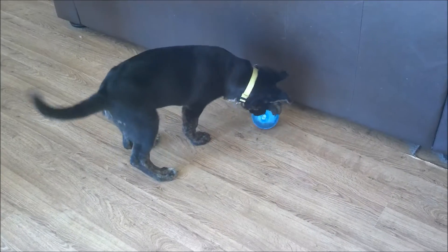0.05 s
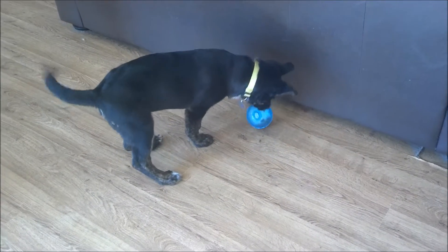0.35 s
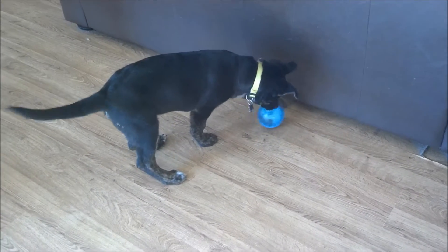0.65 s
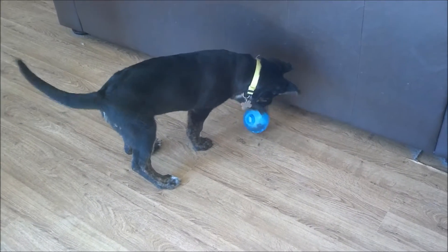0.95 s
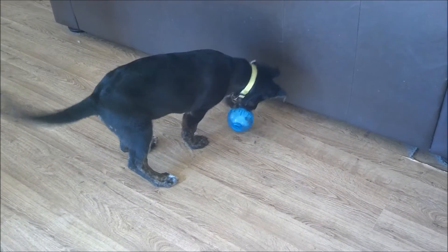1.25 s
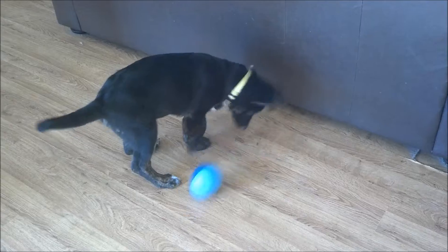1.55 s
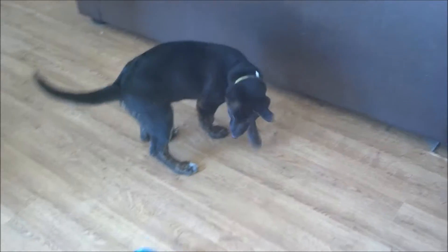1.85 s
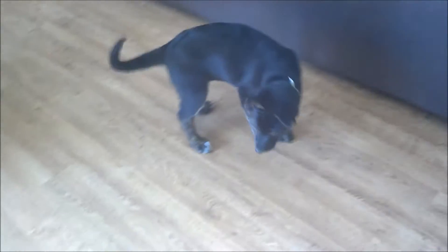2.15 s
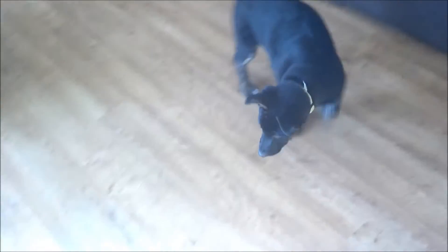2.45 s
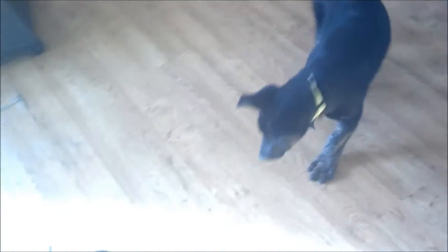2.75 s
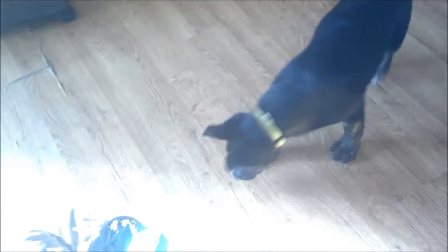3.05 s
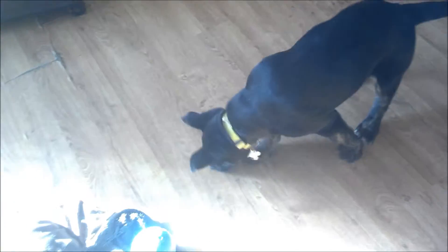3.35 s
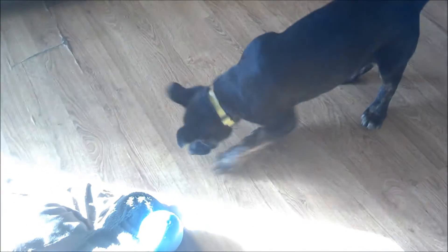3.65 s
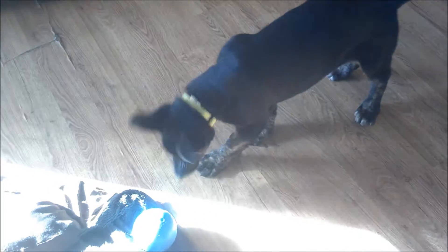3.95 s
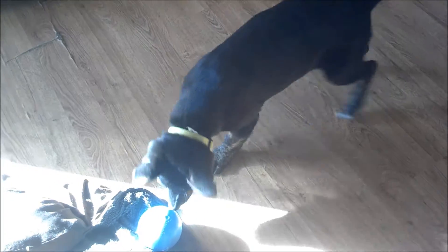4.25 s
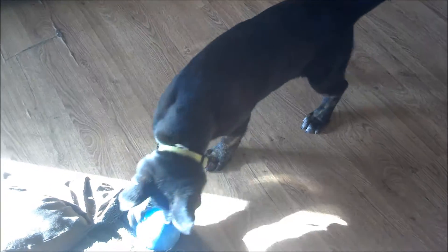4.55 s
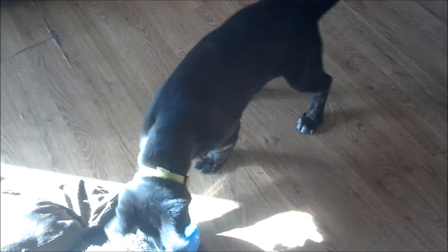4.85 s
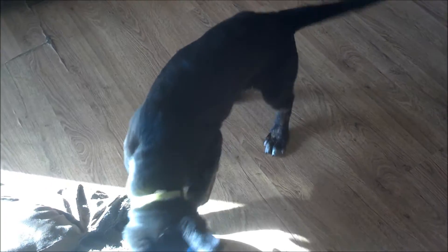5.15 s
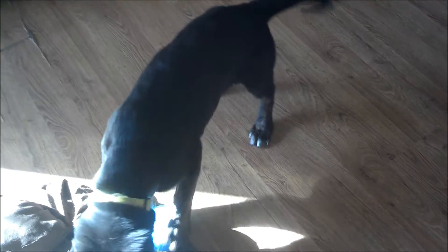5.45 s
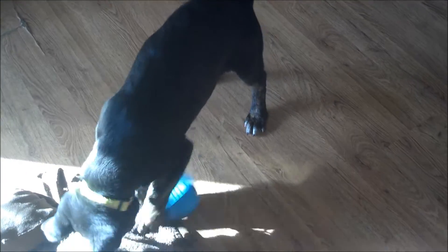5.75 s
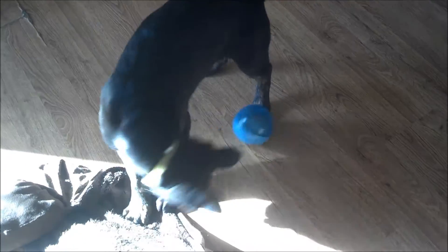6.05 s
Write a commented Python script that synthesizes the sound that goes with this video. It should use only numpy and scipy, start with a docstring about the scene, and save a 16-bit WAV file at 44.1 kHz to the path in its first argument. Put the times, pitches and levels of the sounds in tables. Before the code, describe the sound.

A puppy plays with a hollow plastic treat ball on a laminate floor, heard close and slightly to the left in a small room. For the first 1.5 seconds, teeth and claws tick on the shell and kibble rattles in short nudges, with low rubbing judders near 0.6 and 1.4 seconds. At 1.5 seconds the ball rolls free with a hollow rumble and clattering pellets, bumping quickly over the boards from about 2 to 2.6 seconds among sharp clicks. The rattle settles by 3 seconds, leaving soft paw thuds and faint ticks. Cloth begins to rustle, growing into stronger shoves from 4.4 seconds as the puppy rummages. Its metal collar tag jingles briefly at about 4.4 and 4.9 seconds. At 5.8 seconds comes one hard bang, the loudest sound, and the ball rolls again, rattling and clicking to the end.

```python
"""A small room with a laminate floor; a close stereo microphone pair, the action a little to the left.
A puppy noses a hollow plastic treat ball: kibble rattles inside, claws and teeth tick on the shell.
At 1.5 s the ball rolls free, rumbling and bumping over the boards past the microphones.
From 3 s the puppy rummages after it in a heap of cloth, its collar tag jingling.
At 5.8 s one hard bang knocks the ball loose and it rolls again."""
import sys
import numpy as np
from scipy import signal
from scipy.fft import rfft, irfft
from scipy.io import wavfile
from scipy.ndimage import uniform_filter1d

SR = 44100
rng = np.random.default_rng(int(sys.argv[2]) if len(sys.argv) > 2 else 0)


def int16_out(signal):
    """Quantize to a 16-bit WAV file."""
    q = np.round(np.clip(np.atleast_2d(signal).T, -1, 1) * 32767)
    wavfile.write(sys.argv[1], SR, q.astype(np.int16))


N = 272979
T = np.arange(N) / SR

# spectrum of the room tone: frequency_hz, level_db
ROOM_TONE_SPECTRUM = [(30, -26), (70, -37), (130, -6.5), (320, 7.5), (600, -5), (1000, 0), (2000, -12.5),
                      (3600, -1.5), (4800, -16), (6600, -8), (10000, -15), (15500, -10)]
# how hard nose and paws work in the cloth: time_s, effort_db
RUMMAGE_EFFORT = [(3.15, -71.5), (3.48, -61), (3.67, -61), (4.34, -55.5), (4.71, -51), (4.93, -47),
                  (5.27, -55.5), (5.52, -51.5), (5.77, -53.5)]
# quick shoves of the muzzle over the ball and through the cloth: start_s, length_s, level_db
MUZZLE_SHOVES = [(0.512, 0.1, -48.5), (3.22, 0.014, -57), (4.489, 0.08, -43), (4.707, 0.15, -50.5),
                 (4.876, 0.068, -45), (5.008, 0.026, -44.5), (5.107, 0.018, -50.5), (5.314, .01, -48.5),
                 (5.325, 0.067, -44.5), (5.674, 0.071, -43.5)]
# spectrum of catching fibres: frequency_hz, level_db
FIBRE_SPECTRUM = [(800, -11), (1400, 3.5), (2200, 1), (3600, 5), (4800, -4.5), (6500, 7.5), (8500, -3),
                  (10000, -8.5), (15500, -19)]
# spectrum of the whole heap rubbing: frequency_hz, level_db
HEAP_SPECTRUM = [(40, -47), (100, -4.5), (200, -1.5), (380, 3), (700, -3), (1300, -9), (2200, -16.5),
                 (5000, -22.5)]
# the collar tag touches its ring: start_s, level_db, tilt_db_per_octave
TAG_TOUCHES = [(3.417, -37.5, -44), (3.872, -38.5, -39), (4.219, -37, -28), (4.385, -30.5, -40),
               (4.4095, -13.5, -25), (4.423, -23, -3), (4.865, -17.5, -34), (4.883, -22, -2)]
# the chatter within one touch: delay_s, level_db
TAG_CHATTER = [(0, -3.5), (.006, -1.5), (.013, -7.5)]
# modes of the metal tag: pitch_hz, level_db, t60_s
TAG_MODES = [(6600, -10, .06), (7400, -3.5, .08), (8366, -9, .1), (9745, 0, .09), (11970, -3, .12),
             (14060, -14, .1), (15140, 0, .11)]
# claws, teeth and single pellets on plastic and floor: start_s, level_db, pitch_hz, t60_ms
TIP_CLICKS = [(0.115, -38.5, 6700, 19), (0.2466, -21.5, 6730, 13), (0.2605, -25.5, 6740, 17),
              (0.321, -34, 8500, 12), (0.3277, -28, 6540, 16), (0.3844, -25.5, 6740, 21),
              (0.4293, -28.5, 6700, 13), (0.453, -29.5, 6660, 31), (0.4936, -19, 6740, 9.6),
              (0.5264, -36, 3720, 8.7), (0.5973, -27.5, 6500, 18), (0.6105, -23, 6200, 14),
              (0.626, -25.5, 6200, 11), (0.689, -28, 7450, 24), (0.703, -25, 7400, 16),
              (0.7328, -17.5, 6200, 5), (0.7375, -25.5, 5570, 9.8), (0.9704, -32, 6470, 12),
              (1.133, -37.5, 6100, 20), (1.259, -44, 6350, 8), (1.3144, -29.5, 5860, 10),
              (1.357, -28.5, 6200, 16), (1.381, -27, 6250, 4.4), (1.417, -25, 6370, 9.5),
              (1.4558, -23, 6300, 10), (1.467, -21, 6200, 6.6), (1.4854, -18, 5900, 12),
              (1.5404, -24, 6340, 12), (1.559, -20, 6800, 15), (1.707, -22, 6500, 27),
              (1.75, -17, 6460, 15.5), (1.7875, -18, 6500, 24), (2.134, -27, 6700, 16),
              (2.1791, -25.5, 6750, 12), (2.2603, -24, 6540, 9), (2.3263, -22.5, 6600, 6.7),
              (2.3495, -23, 6500, 9.8), (2.3772, -18.5, 6600, 8.1), (2.5244, -24, 6730, 7),
              (2.6081, -22, 3700, 7.6), (2.6346, -16.5, 6600, 4.9), (2.71, -30, 6640, 9.4),
              (2.725, -22.5, 6600, 7.5), (2.762, -27, 6700, 29), (2.8604, -28.5, 6680, 9.8),
              (2.8913, -35, 6570, 23), (2.8992, -34, 3550, 16), (3.042, -43, 3520, 8.2),
              (3.131, -48, 3530, 10), (3.238, -41, 6200, 11), (3.483, -39, 6860, 6.9),
              (4.4987, -34, 6600, 13), (4.525, -22, 6400, 19), (4.5454, -30, 6470, 9.2),
              (4.764, -31.5, 3630, 4.5), (4.9512, -28.5, 6200, 8.2), (4.965, -38, 6170, 11),
              (5.028, -26.5, 6760, 16), (5.0545, -25.5, 6700, 6.1), (5.3397, -25.5, 6400, 27),
              (5.892, -28, 6500, 11), (5.933, -22, 6540, 7.4), (5.9633, -27, 6200, 5.4),
              (5.9865, -18, 6700, 7.8), (6.0288, -18.5, 6740, 5)]
# clicks dull as the ball passes the microphones into the cloth, and clear as it leaves: start_s, top_hz
SNAP_CUTOFFS = [(0, 13800), (1.9, 9100), (4.45, 7500), (5.75, 11000)]
# the ball sticks and slips under the nose: start_s, length_s, gap_s, level_db, pitch_hz
STICK_SLIPS = [(0.607, .085, 0.031, -26, 284), (1.439, .055, .02, -25.5, 310)]
# modes of the pressed ball: pitch_ratio, level_db
PRESSED_MODES = [(.62, -13), (1, 0), (1.33, -5), (1.85, -10)]
# modes of the floorboards: pitch_hz, level_db, t60_s
BOARD_MODES = [(133, 2.5, 0.26), (162, 6.5, 0.16), (216, 7, 0.14), (257.5, 8, .058), (390, -3.5, 0.073),
               (499, -18.5, 0.28), (594, -15, 0.1)]
# the rolling ball bumps over its seam and openings: start_s, level_db
SEAM_BUMPS = [(1.665, -28.5), (1.93, -25.5), (1.9689, -23.5), (1.9962, -18.5), (2.0401, -14), (2.089, -18),
              (2.1265, -18), (2.1715, -12.5), (2.232, -20), (2.272, -14.5), (2.3168, -18.5), (2.349, -19),
              (2.394, -18.5), (2.403, -15), (2.4342, -15), (2.464, -21), (2.489, -20.5), (2.518, -21),
              (2.5474, -16), (2.58, -19.5)]
# paws and ball thud on the boards: start_s, level_db
FLOOR_THUDS = [(3.047, -38), (3.496, -43.5), (3.583, -41), (3.753, -34), (4.688, -38.5), (5.123, -28.5),
               (5.796, -10), (5.817, -15.5), (6.182, -21)]
# the shell is rapped, then slammed down: start_s, level_db, nominal_pitch_hz, t60_ms
SHELL_RAPS = [(5.039, -28.5, 1290, 6.2), (5.7942, -3, 800, 3.4)]
# the nose nudges the ball: start_s, length_s, rise_s, rattle_db, rub_over_rattle_db
NOSE_NUDGES = [(0, 0.0018, 0.00067, -42, -7.5), (0.075, 0.2, 0.0078, -67, 11), (0.236, 0.61, 0.004, -55, 1),
               (0.578, 0.053, 0.0049, -38.5, -8), (0.947, 0.26, 0.0021, -58, -4),
               (1.231, 0.048, 0.066, -43, -13), (1.34, 0.23, 0.074, -33.5, -12),
               (1.432, 0.018, 0.0048, -32.5, -1)]
# the ball rolls free: start_s, length_s, rattle_db, scrape_db, rumble_db, launch_speed_ratio, settle_s
FREE_ROLLS = [(1.52, 1.09, -40.5, -51, -41, 1.24, 0.35), (5.794, 0.22, -36, -53.5, -33, 1.35, 0.058)]
# the ball drones on the boards, lower as it slows: time_s, pitch_hz, level_db
DRONE_GLIDE = [(1.49, 710, -36), (1.559, 670, -43), (1.639, 650, -47), (1.726, 615, -35), (1.811, 580, -52),
               (1.939, 560, -41.5), (2.05, 520, -68)]
# modes of the hollow ball, woken by a fast roll: pitch_hz, level_db, t60_s
HOLLOW_MODES = [(485, -6, 0.21), (590, -0.5, 0.13), (718, 7, 0.16), (827, 0.5, .14), (958, -2, 0.13),
                (1078, -8, 0.12)]
# spectrum of the shell scraping the floor: frequency_hz, level_db
SCRAPE_SPECTRUM = [(120, -55), (300, -38), (550, 2.5), (800, -5), (1300, 4), (1850, 1), (2150, 7),
                   (3600, -24.5), (5000, -2), (12000, -12)]
# spectrum of the rumble at a speed ratio of 1: frequency_hz, level_db
RUMBLE_SPECTRUM = [(30, -33), (110, -33), (200, -8), (330, -5), (430, -0.5), (550, 2), (640, 1.5),
                   (850, -7), (1400, -10.5), (2400, -39)]
# spectrum of sliding kibble: frequency_hz, level_db
KIBBLE_SPECTRUM = [(1500, -16.5), (2900, -5), (3500, -1.5), (4700, -11), (5600, -1), (6500, 2),
                   (7400, -6.5), (8600, -1.5), (9800, -16.5), (12000, -20.5), (15500, -45)]
# modes of the plastic shell under the pellets: pitch_hz, level_db, t60_s
SHELL_MODES = [(3340, -2, 0.0094), (4000, 0.5, 0.033), (5700, -11, 0.015), (6130, 7.5, 0.012),
               (6436, 11, 0.016), (6850, 5, 0.045), (8300, 0.5, 0.015), (10900, -3, 0.011)]
# dips and a lift in the difference of the two microphones: centre_hz, half_width_hz, gain_db
SIDE_EQ = [(1217, 370, -16), (2130, 380, 7), (3570, 280, -26)]

KNOCK_T60_MS = 27.2  # decay of a bump or thud


def undb(db):
    """Decibels to gain."""
    return 10 ** (np.asarray(db) / 20)


def unit(x):
    """Scale to rms 1."""
    return x / np.sqrt(np.mean(x ** 2))


def together(gains):
    """The joint gain of unrelated sounds: their powers add."""
    return np.sqrt(np.sum(np.square(gains), axis=0))


def butter(x, order, hz, kind="low"):
    """Pass x through a Butterworth filter."""
    return signal.sosfilt(signal.butter(order, hz, kind, fs=SR, output="sos"), x)


def colour(x, spectrum):
    """Shape x by a spectrum of frequency_hz, level_db points; rms 1."""
    hz, db = np.transpose(spectrum)
    f = np.fft.rfftfreq(N, 1 / SR) + 1
    return unit(irfft(rfft(x) * undb(np.interp(np.log(f), np.log(hz), db)), N))


def band_gain(x, hz, half_width_hz, gain_db):
    """Turn a narrow band up or down."""
    f = np.fft.rfftfreq(N, 1 / SR)
    dip = (1 - undb(gain_db)) / (1 + ((f - hz) / half_width_hz) ** 4)
    return irfft(rfft(x) * (1 - dip), N)


def add(track, start_s, sound):
    """Mix a sound into a track."""
    i = int(np.clip(start_s * SR, 0, N - 1))
    track[..., i:i + sound.shape[-1]] += sound[..., :N - i]


def ring(modes, t):
    """A sum of decaying modes."""
    return sum(undb(db - 60 * t / t60) * np.sin(2 * np.pi * hz * t) for hz, db, t60 in modes)


def grains(per_s, spread_db):
    """Tiny impacts at random moments; a wide spread makes a few much larger than the rest."""
    size = undb(spread_db * np.minimum(rng.exponential(size=N), 4))
    return (rng.random(N) < per_s / SR) * size * rng.choice([-1, 1], N)


def flutter(rate_hz, depth_db):
    """A gain that wanders at random."""
    steps = rng.standard_normal(4096)
    return undb(depth_db * np.interp(T * rate_hz, np.arange(len(steps)), steps))


def swell(start_s, length_s, rise_s, t60_s):
    """A gain that rises, holds and dies away."""
    out, age = np.zeros(N), T[:int((length_s + t60_s) * SR)]
    fade = undb(-60 * np.maximum(age - length_s, 0) / t60_s)
    add(out, start_s, (1 - np.exp(-age / rise_s)) * fade)
    return out


def mic_pair(mid, side, apart_hz):
    """Two closely spaced microphones differ a little more in the treble than in the bass."""
    side = 0.75 * side + 0.25 * butter(side, 2, apart_hz, "high")
    return np.array([mid + side, mid - side]) / np.sqrt(2)


def room(x, wet_db):
    """Floor and near walls answer within milliseconds, then thicken into a short tail."""
    low_t60_s, high_t60_s = 0.46, 0.49
    t = T[:SR * 3 // 4]
    echoes = rng.standard_normal((2, len(t))) * (1 + 3 * (rng.random((2, len(t))) < .01))
    low = butter(echoes, 2, 2500) * undb(-60 * t / low_t60_s)
    high = butter(echoes, 2, 2500, "high") * undb(-60 * t / high_t60_s)
    onset = np.clip((t - .003) / 0.0019, 0, 1)
    early_lift = 1 + 2.77 * np.exp(-t / 0.012)
    tail = (low - high) * onset * early_lift
    tail /= np.sqrt(np.sum(tail ** 2, axis=1, keepdims=True))
    wet = signal.fftconvolve(np.atleast_2d(x), mic_pair(*tail, apart_hz=1460), axes=1)[:, :N]
    return (x + undb(wet_db) * wet) / np.sqrt(1 + undb(wet_db) ** 2)


def room_tone():
    """A faint steady hush, with low noise unrelated between left and right."""
    hush = mic_pair(*rng.standard_normal((2, N)), apart_hz=1230)
    low = butter(rng.standard_normal((2, N)), 2, 90)
    return undb(-63.5) * colour(hush + 6.4 * low, ROOM_TONE_SPECTRUM)


def cloth():
    """Fibres slip and catch under nose and paws, over the duller rub of the whole heap."""
    effort_db = np.interp(T, *np.transpose(RUMMAGE_EFFORT), left=-np.inf, right=-np.inf)
    steady = undb(-66 + 2.1 * (effort_db + 55))  # the rustle grows faster than the effort
    shoves = [undb(db) * swell(s, length, rise_s=0.0021, t60_s=0.33) for s, length, db in MUZZLE_SHOVES]
    rustle = together([steady] + shoves) * undb(5.5)
    catches = mic_pair(grains(1800, spread_db=2.5), 0.66 * grains(2200, spread_db=4.5), apart_hz=1760)
    fibres = colour(catches, FIBRE_SPECTRUM) * flutter(rate_hz=59, depth_db=1.5) * rustle
    heap = colour(rng.standard_normal(N), HEAP_SPECTRUM) * flutter(rate_hz=25, depth_db=2.0)
    return room(fibres, wet_db=-7.0) + room(heap * undb(effort_db + 2.5), wet_db=3.5)


def collar_tag():
    """The metal tag chatters against its ring, which detunes it a little at every contact."""
    out, t = np.zeros((2, N)), T[:SR // 6]
    detune, lowest_hz = .0025, TAG_MODES[0][0]
    for s, db, tilt_db in TAG_TOUCHES:
        modes = [(hz, mode_db + tilt_db * np.log2(hz / lowest_hz), t60) for hz, mode_db, t60 in TAG_MODES]
        for delay_s, bounce_db in TAG_CHATTER:
            metal = np.zeros((2, len(t)))
            for channel in metal:
                detuned = [(hz * (1 + detune * rng.standard_normal()), *rest) for hz, *rest in modes]
                channel += ring(detuned, t)
            grating = rng.standard_normal(metal.shape) * undb(-12 - 60 * t / 0.041)
            touch = butter(metal + grating, 2, 5500, "high")
            add(out, s + delay_s, undb(db + bounce_db - 7.5) * touch / np.abs(touch).max())
    return room(out, wet_db=0.0)


def clicks():
    """A hard tip snaps or chatters on the shell, rings it briefly and faintly stirs its hollow."""
    out, t = np.zeros((2, N)), T[:SR // 25]
    for s, db, hz, t60_ms in TIP_CLICKS:
        age = t * 1000 / t60_ms
        envelope = undb(-60 * age) * (1 - np.exp(-age / 0.025))
        mid, side = rng.standard_normal((2, len(t))) * envelope
        crack = mic_pair(mid, 0.71 * side, apart_hz=2000)
        shell = butter(crack, 2, [0.862 * hz, 1.152 * hz], "bandpass")
        hollow = butter(crack, 1, [750, 1800], "bandpass")
        top_hz = [top for from_s, top in SNAP_CUTOFFS if from_s <= s][-1]
        snap = butter(crack, 2, [3800, top_hz], "bandpass")
        click = shell + 0.28 * snap + 0.18 * hollow
        add(out, s, undb(db + 4.5) * click / np.abs(click).max())
    return room(out, wet_db=-3.0) * undb([[.5], [-.5]])


def judders():
    """Pressed under the soft muzzle, the ball gives a low thump at every slip, each a little different."""
    out, t = np.zeros(N), T[:SR // 6]
    rise_s, t60_s, fade_db_per_s = 0.0058, 0.032, 98
    for s, length_s, gap_s, db, hz in STICK_SLIPS:
        for age in np.arange(0, length_s, gap_s):
            modes = [(hz * ratio * (1 + 0.03 * rng.standard_normal()), mode_db, t60_s)
                     for ratio, mode_db in PRESSED_MODES]
            thump = ring(modes, t) * (1 - np.exp(-t / rise_s)) ** 2
            add(out, s + age, undb(db - fade_db_per_s * age) * thump / np.abs(thump).max())
    return room(out, wet_db=3.5)


def knocks(blows, wet_db):
    """A blow sends bending waves through the boards; short ones run fastest, so the pitch falls."""
    out, t = np.zeros(N), T[:SR // 6]
    boards = ring(BOARD_MODES, t)
    boards /= np.sqrt(np.sum(boards ** 2))
    last_hz, tock_hz, glide_cycles, rise_cycles = 195, 1006, 2.8, .6
    for s, db, hz, t60_ms in blows:
        pitch_hz = last_hz + (1.35 * hz - last_hz) * np.exp(-t * hz / glide_cycles)
        decay = undb(-60 * t * 1000 / t60_ms)
        rise = 1 - np.exp(-t * hz / rise_cycles)
        bending = decay * rise * np.sin(2 * np.pi * np.cumsum(pitch_hz) / SR)
        tock = undb(-9) * decay ** 2 * np.sin(2 * np.pi * tock_hz * t)  # the hollow shell answers
        knock = bending / np.abs(bending).max() + tock
        stir = undb(-11.5) * np.sqrt(t60_ms / KNOCK_T60_MS)  # a brief blow stirs the boards less
        add(out, s, undb(db + .8) * (knock + stir * signal.fftconvolve(knock, boards)[:len(t)]))
    return room(butter(out, 4, 112, "high"), wet_db)


def bumps_and_thuds():
    """Ball and paws land dully on the boards; harder bumps ring higher."""
    bump_hz, thud_hz, rise_per_db = 511, 544, .012
    bumps = [(s, db, bump_hz * (1 + rise_per_db * (db + 20)), KNOCK_T60_MS) for s, db in SEAM_BUMPS]
    thuds = [(s, db, thud_hz, KNOCK_T60_MS) for s, db in FLOOR_THUDS]
    return knocks(bumps + thuds, wet_db=0.0)


def ball_motion():
    """Nudges, rolls and bumps set the gains of rattle, rattle treble, scrape and rumble, and the speed."""
    nudge_speed, nudge_t60_s, stop_t60_s, slowing_s = .6, 0.63, 0.25, 1.4
    rattle, treble, scrape, rumble = [], [], [], []
    speed = np.full(N, nudge_speed)
    for s, length_s, rise_s, db, rub_db in NOSE_NUDGES:
        push = undb(db) * swell(s, length_s, rise_s, nudge_t60_s)
        rattle.append(push)
        treble.append(push * undb(-2.0))
        scrape.append(push * undb(rub_db - 5.0))
        rumble.append(undb(db + rub_db) * swell(s, length_s, rise_s, stop_t60_s))
    # a free ball slows, and its pellets land more softly and settle after it stops
    for s, length_s, rattle_db, scrape_db, rumble_db, launch, settle_s in FREE_ROLLS:
        slowing = np.exp(-np.clip(T - s, 0, length_s) / slowing_s)
        speed = np.where(T >= s, launch * slowing, speed)
        starting = 1 - np.exp(-np.maximum(T - s, 0) / 0.009)
        settling = np.exp(-(np.maximum(T - s - length_s, 0) / settle_s) ** 2)
        tumbling = starting * settling
        rattle.append(undb(rattle_db) * tumbling * slowing ** .5)
        treble.append(undb(rattle_db + 7.5) * tumbling * slowing ** 4.6)
        scrape.append(undb(scrape_db) * tumbling * slowing ** 0.77)
        rumble.append(undb(rumble_db) * swell(s, length_s, 0.0029, stop_t60_s) * slowing ** 0.26)
    # each bump throws the pellets about
    thrown = together([undb(db - 18.5) * swell(s, 0, rise_s=0.00096, t60_s=0.24) for s, db in SEAM_BUMPS])
    rattle.append(thrown)
    treble.append(thrown * undb(-10))
    scrape.append(thrown * undb(-17.5))
    # the bang leaves the boards shaking
    rumble.append(undb(-24) * swell(SHELL_RAPS[-1][0], 0, rise_s=0.0023, t60_s=0.17))
    return together(rattle), together(treble), together(scrape), together(rumble), speed


def drone():
    """The rough floor keeps one narrow resonance of the rolling ball sounding."""
    width_hz = 130
    s, hz, db = np.transpose(DRONE_GLIDE)
    push = butter(rng.standard_normal((2, N)), 2, width_hz / 2)
    phase = 2 * np.pi * np.cumsum(np.interp(T, s, hz)) / SR
    level = uniform_filter1d(undb(np.interp(T, s, db, left=-np.inf, right=-np.inf)), size=SR // 50)
    return unit(push[0] * np.cos(phase) + push[1] * np.sin(phase)) * level


def rolling_shell(scrape, rumble, speed):
    """The shell scrapes and rumbles over the grain of the boards; a fast roll wakes its hollow."""
    scraping = colour(grains(1200, spread_db=4.0), SCRAPE_SPECTRUM) * scrape * undb(4.5)
    # a faster ball runs through the same wood grain sooner, which raises the pitch
    position = np.cumsum(speed) % N
    wood_grain = colour(grains(660, spread_db=4.0), RUMBLE_SPECTRUM)
    rolling = np.interp(position, np.arange(N), wood_grain) * rumble * undb(1.2)
    hollow = unit(signal.fftconvolve(grains(790, spread_db=2.0), ring(HOLLOW_MODES, T[:SR // 5]))[:N])
    hollow *= rumble * speed ** 3.7 * undb(-12.5)
    return room(scraping + rolling, wet_db=1.5) + room(drone() + hollow, wet_db=-7.0)


def kibble(rattle, treble):
    """Pellets slide in the ball and drop across it; each spot they hit rings other modes of the shell."""
    sliding = mic_pair(grains(900, spread_db=1.4), 1.08 * grains(1000, spread_db=0), apart_hz=1500)
    drops = mic_pair(grains(190, spread_db=3.0), 0.6 * grains(130, spread_db=0), apart_hz=1500)
    shell = np.zeros((2, N))
    for mode in SHELL_MODES:
        strikes = drops * rng.uniform(-1.35, 1, N)
        shell += signal.fftconvolve(strikes, ring([mode], T[:SR // 16])[None], axes=1)[:, :N]
    pellets = colour(sliding, KIBBLE_SPECTRUM) + undb(-4.0) * unit(shell)
    pellets *= flutter(rate_hz=110, depth_db=3.5) * undb(1.0)
    # soft landings give a low plastic clatter, hard ones a bright top
    top = signal.sosfiltfilt(signal.butter(2, 9000, "high", fs=SR, output="sos"), pellets)
    low = signal.sosfiltfilt(signal.butter(4, 4600, fs=SR, output="sos"), pellets)
    middle = pellets - top - low
    soft_landing = undb(-42.5)  # below this rattle gain the clatter stands out
    clatter = soft_landing * (rattle / soft_landing) ** 0.77
    return room(low * clatter + middle * rattle + top * treble, wet_db=-1.0)


def scene():
    """Ball, puppy and room as they reach the microphones, a little to the left."""
    left_db = .45
    rattle, treble, scrape, rumble, speed = ball_motion()
    ball = kibble(rattle, treble) + rolling_shell(scrape, rumble, speed)
    blows = bumps_and_thuds() + knocks(SHELL_RAPS, wet_db=-5.0)
    puppy = judders() + clicks() + collar_tag() + cloth()
    return (ball + blows + puppy + room_tone()) * undb([[left_db], [-left_db]])


def record(dry):
    """A phone's stereo pair notches sum and difference at different pitches, and trims bass and top."""
    mid, side = (dry[0] + dry[1]) / 2, (dry[0] - dry[1]) / 2
    mid = band_gain(mid, hz=2502, half_width_hz=208, gain_db=-20.5)
    for band in SIDE_EQ:
        side = band_gain(side, *band)
    mid = butter(mid, 2, 100, "high")
    side = butter(side, 1, 75, "high")
    top_cut = signal.ellip(10, .2, 80, 15400, fs=SR, output="sos")
    return signal.sosfilt(top_cut, np.array([mid + side, mid - side]))


dry = scene()
out = record(dry)
int16_out(out)
```